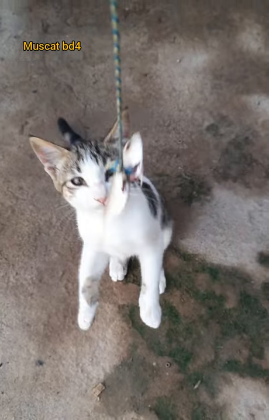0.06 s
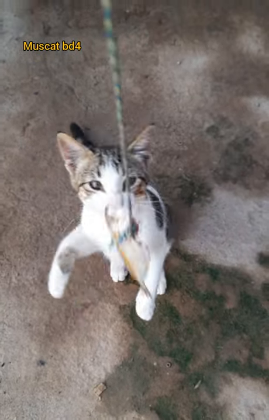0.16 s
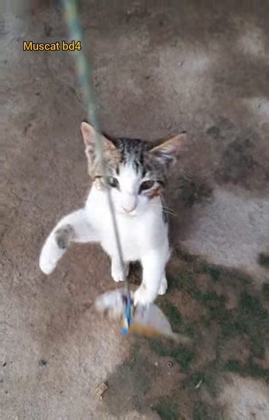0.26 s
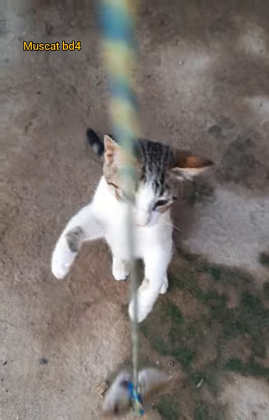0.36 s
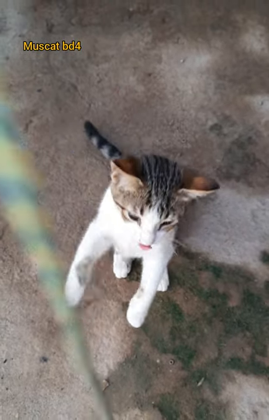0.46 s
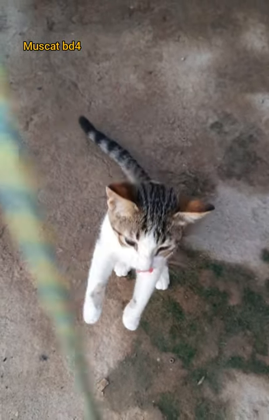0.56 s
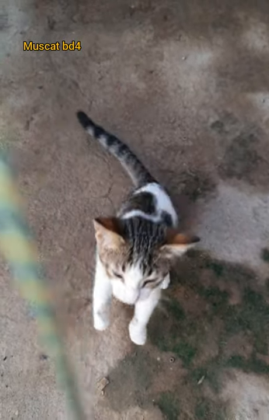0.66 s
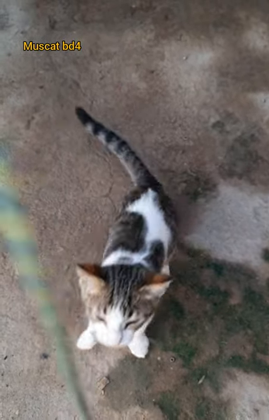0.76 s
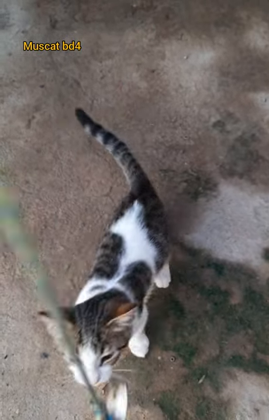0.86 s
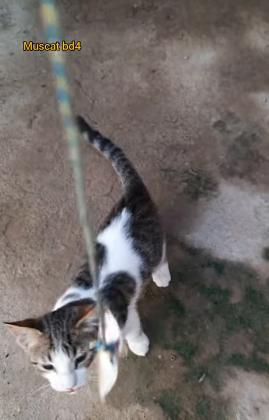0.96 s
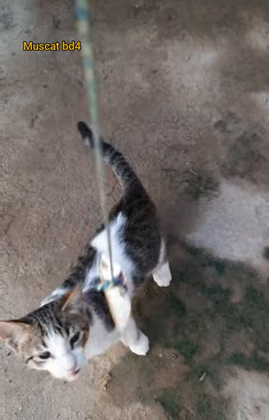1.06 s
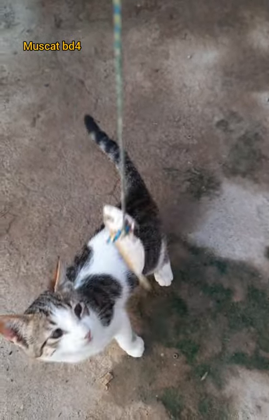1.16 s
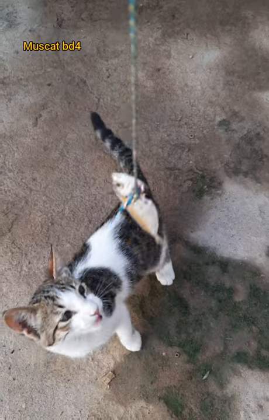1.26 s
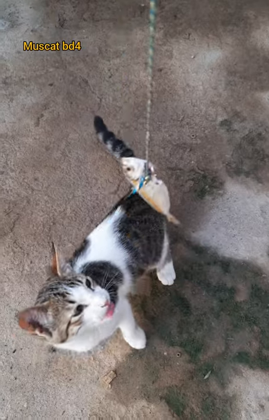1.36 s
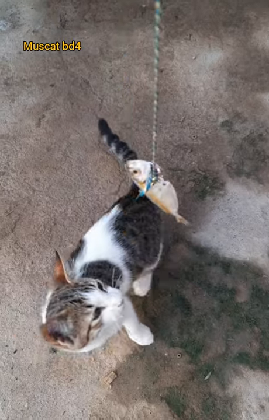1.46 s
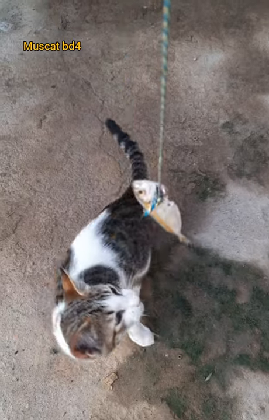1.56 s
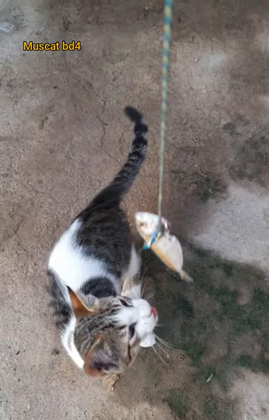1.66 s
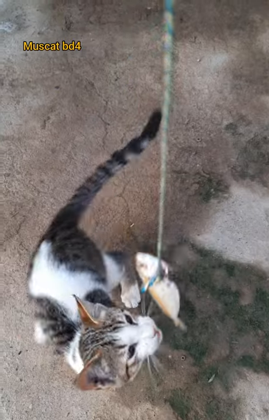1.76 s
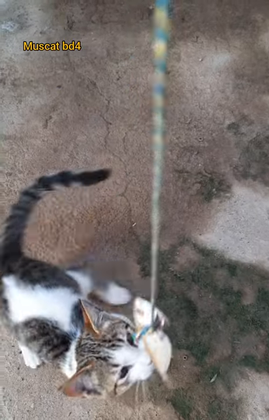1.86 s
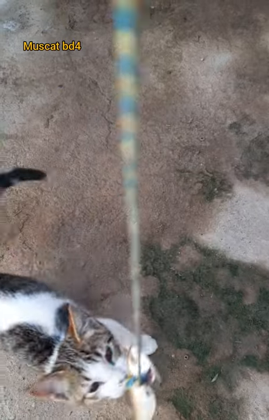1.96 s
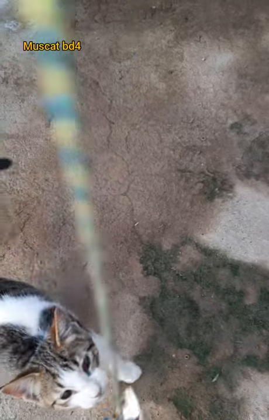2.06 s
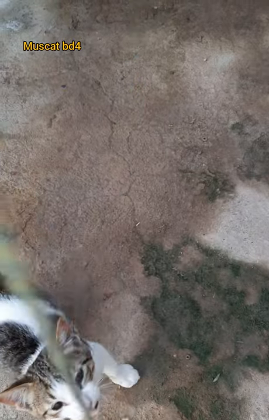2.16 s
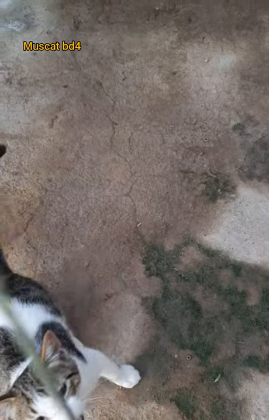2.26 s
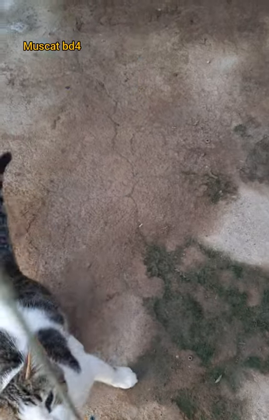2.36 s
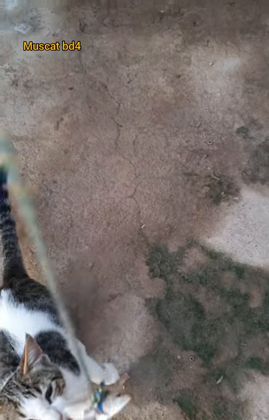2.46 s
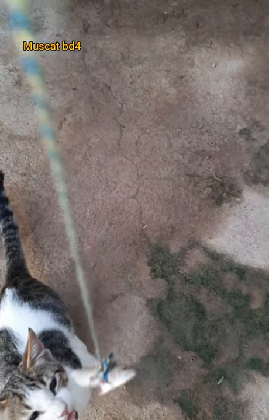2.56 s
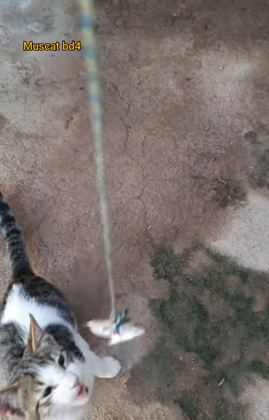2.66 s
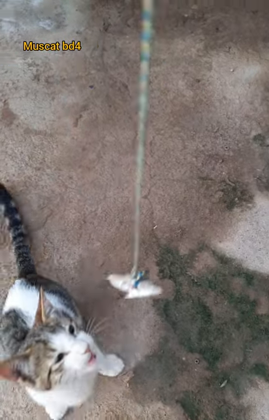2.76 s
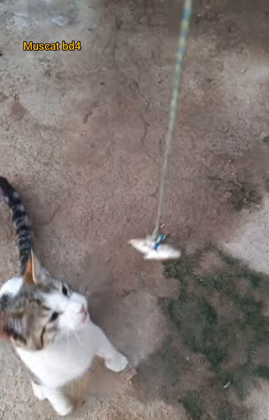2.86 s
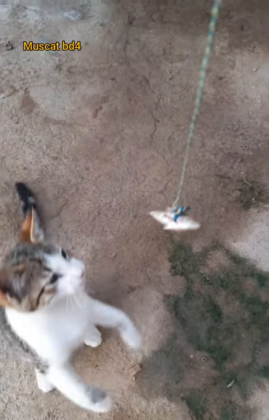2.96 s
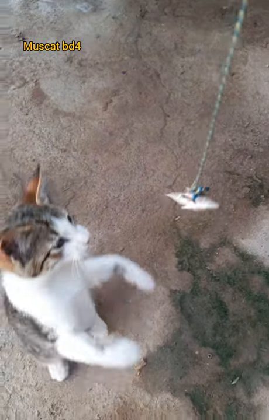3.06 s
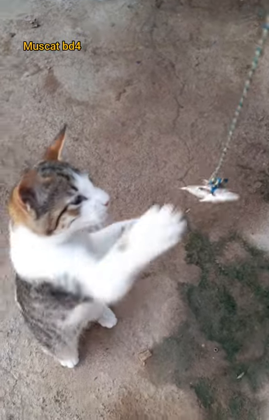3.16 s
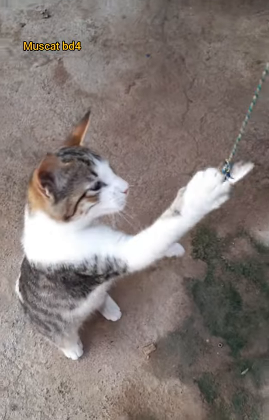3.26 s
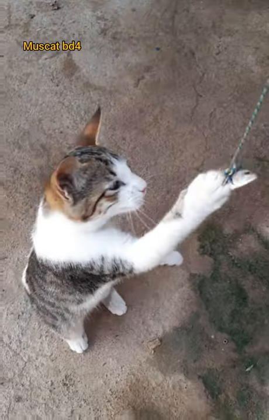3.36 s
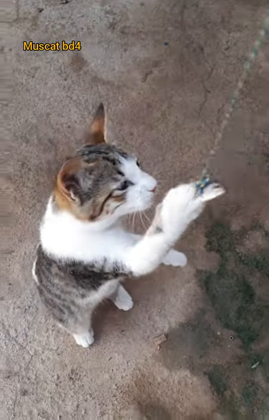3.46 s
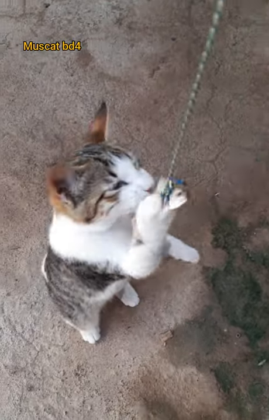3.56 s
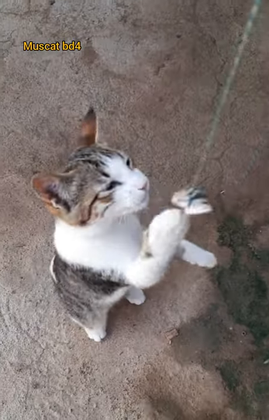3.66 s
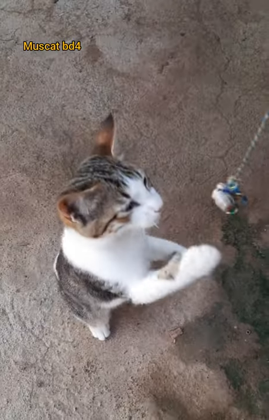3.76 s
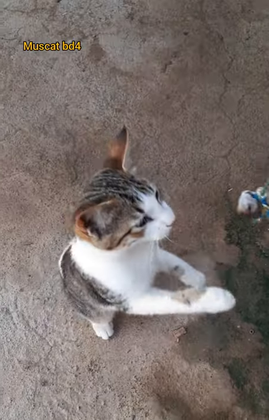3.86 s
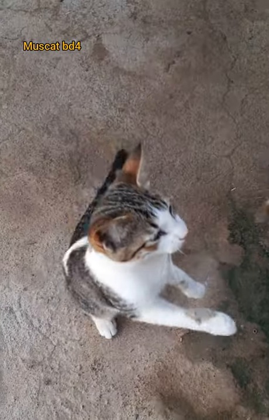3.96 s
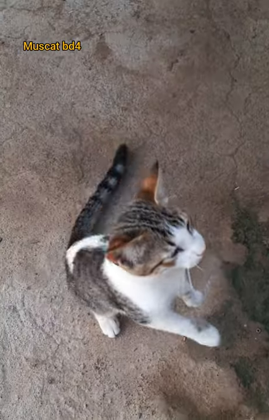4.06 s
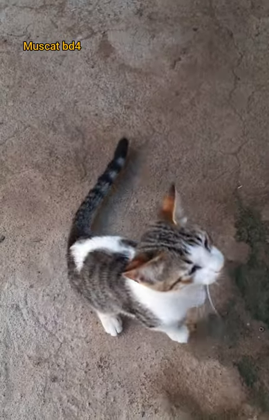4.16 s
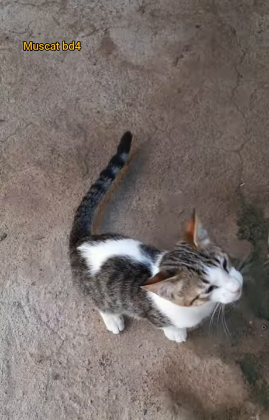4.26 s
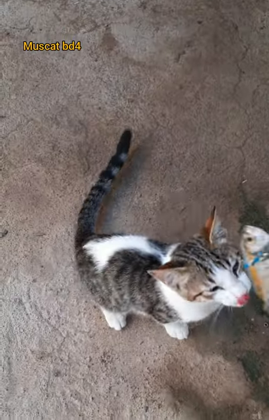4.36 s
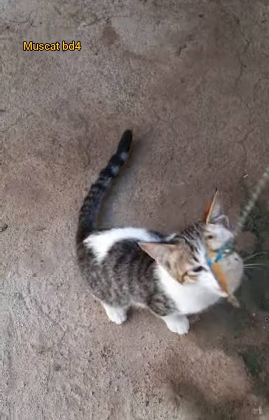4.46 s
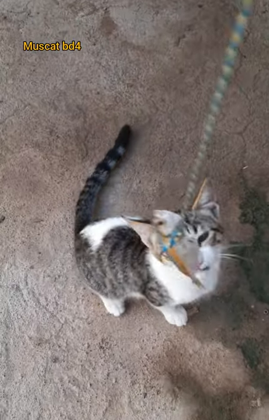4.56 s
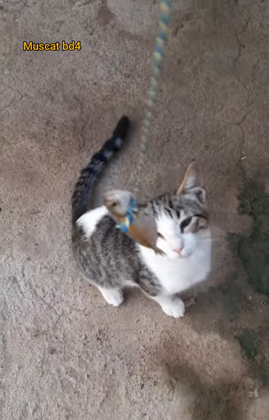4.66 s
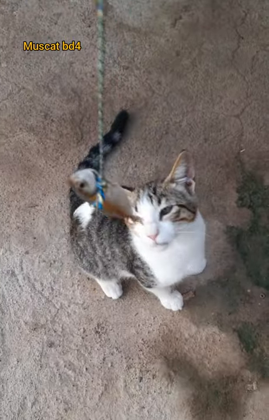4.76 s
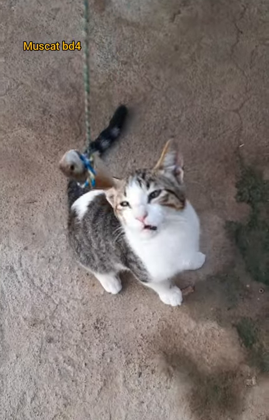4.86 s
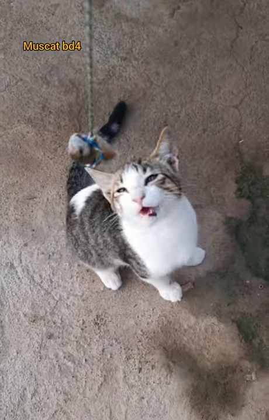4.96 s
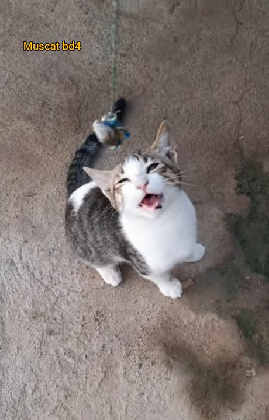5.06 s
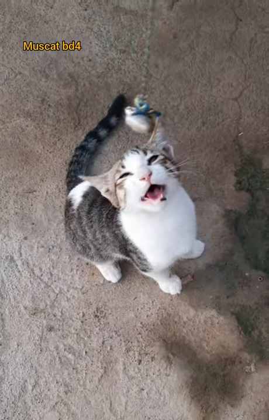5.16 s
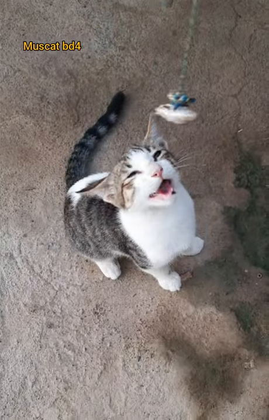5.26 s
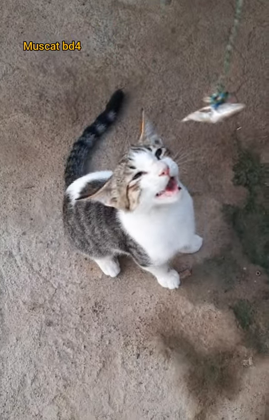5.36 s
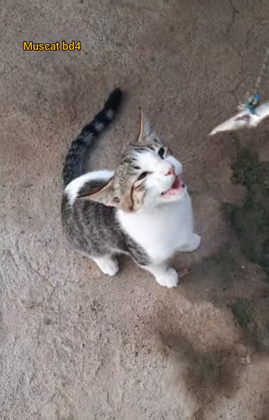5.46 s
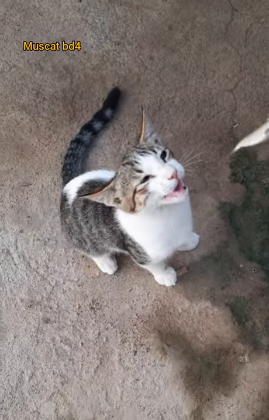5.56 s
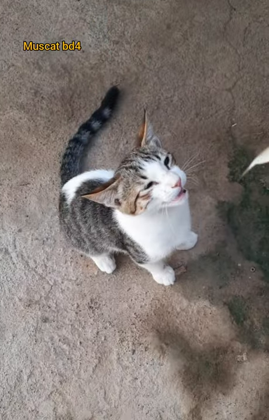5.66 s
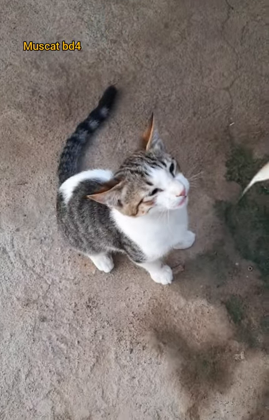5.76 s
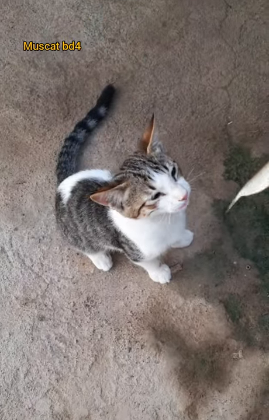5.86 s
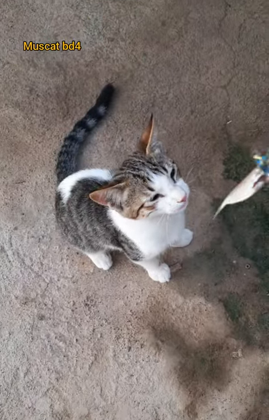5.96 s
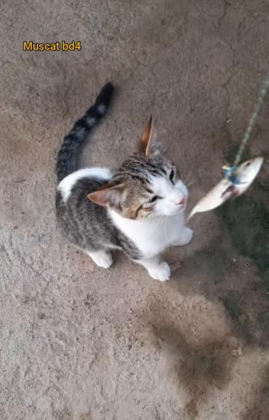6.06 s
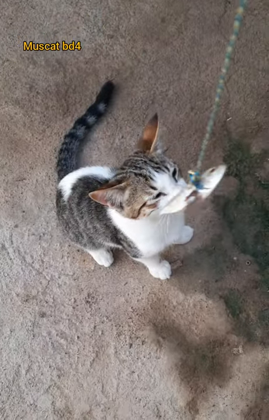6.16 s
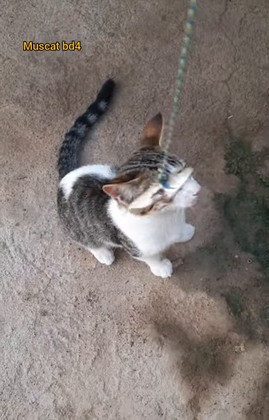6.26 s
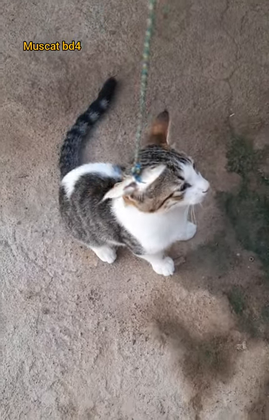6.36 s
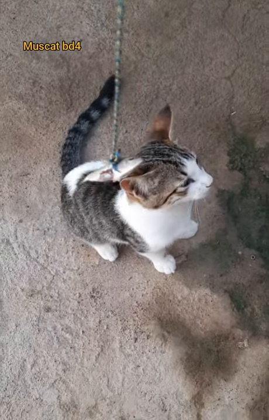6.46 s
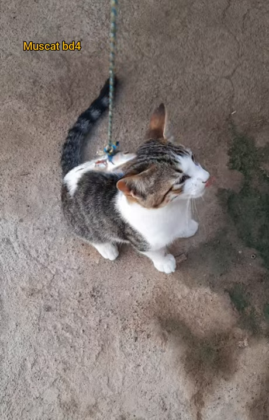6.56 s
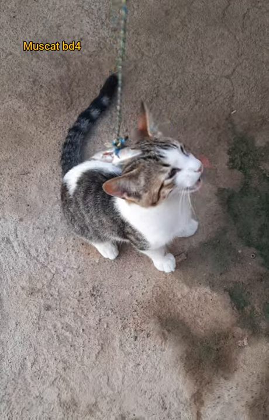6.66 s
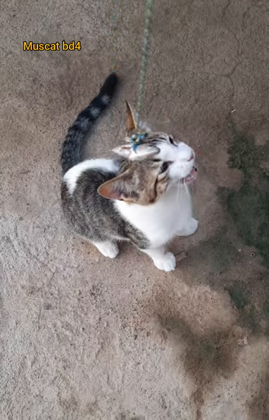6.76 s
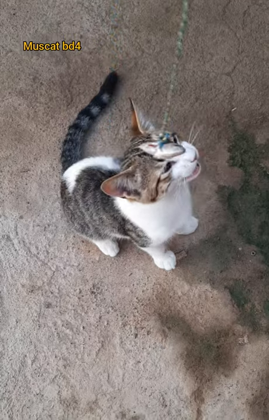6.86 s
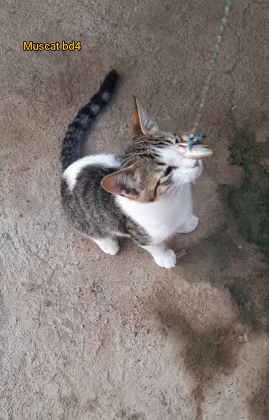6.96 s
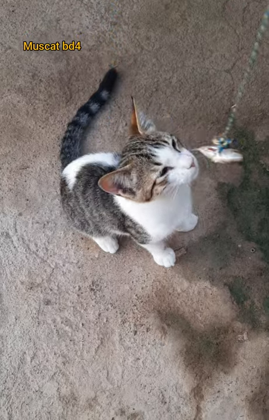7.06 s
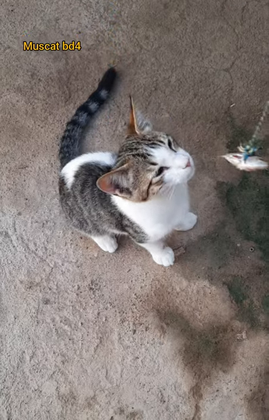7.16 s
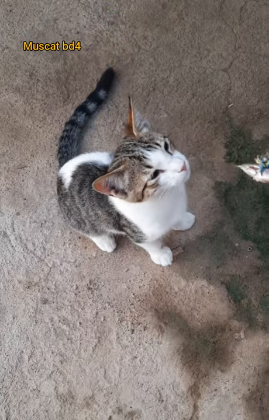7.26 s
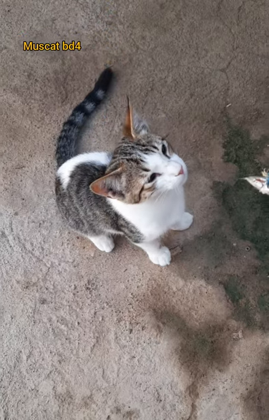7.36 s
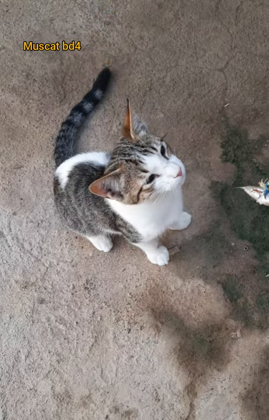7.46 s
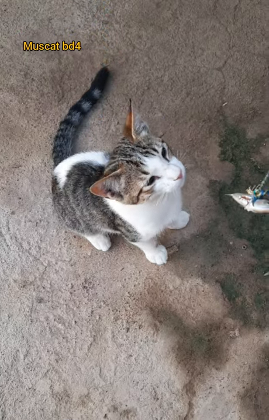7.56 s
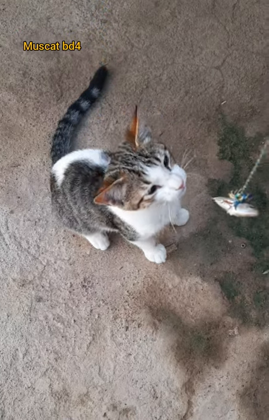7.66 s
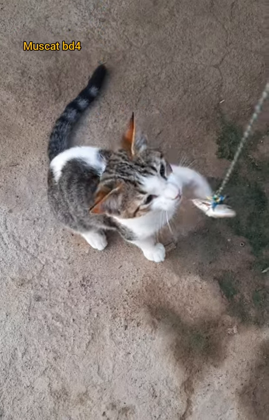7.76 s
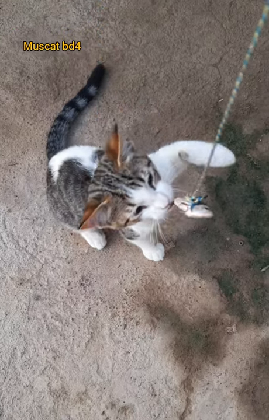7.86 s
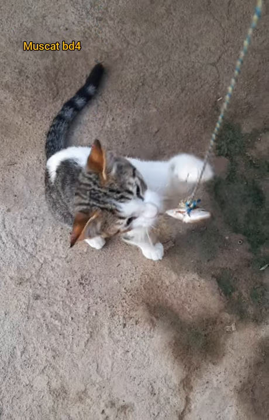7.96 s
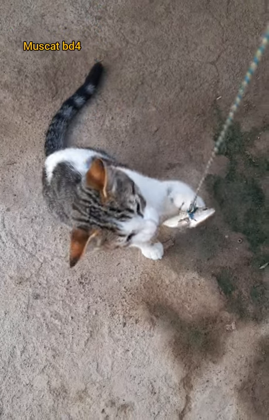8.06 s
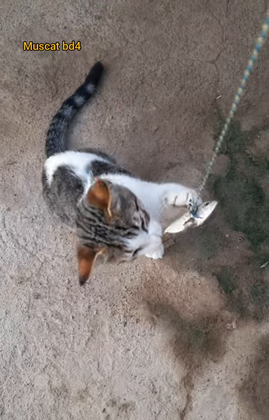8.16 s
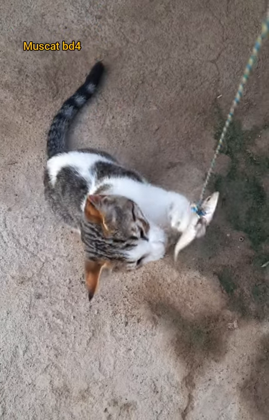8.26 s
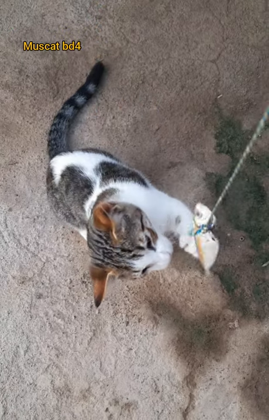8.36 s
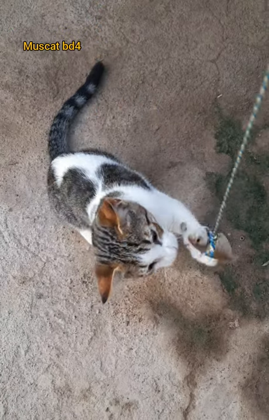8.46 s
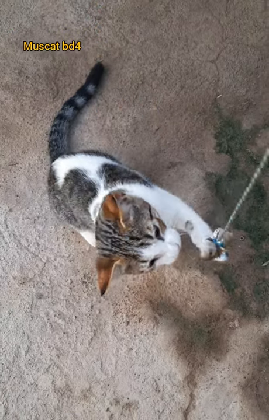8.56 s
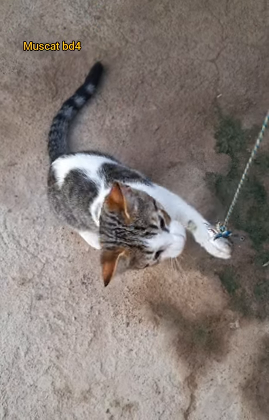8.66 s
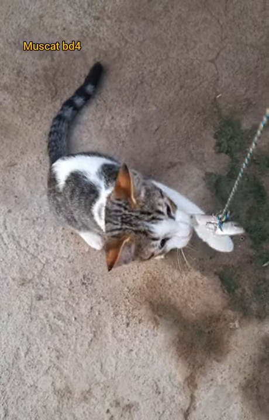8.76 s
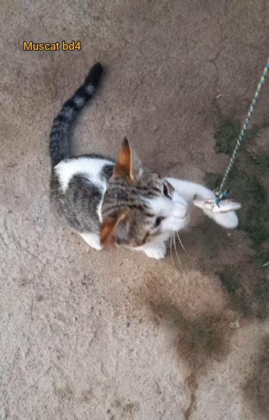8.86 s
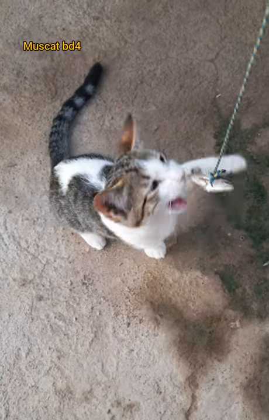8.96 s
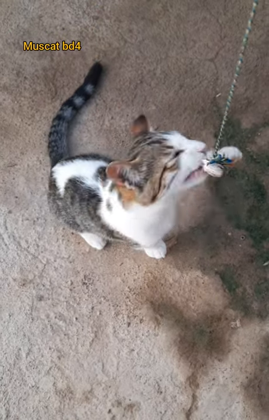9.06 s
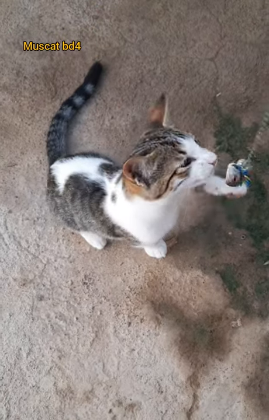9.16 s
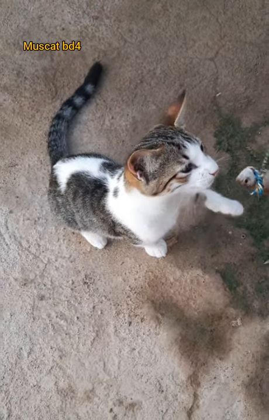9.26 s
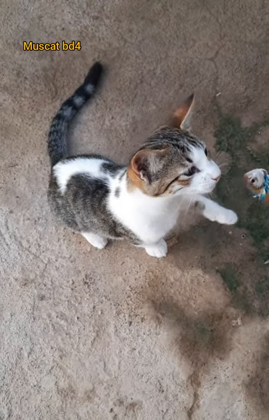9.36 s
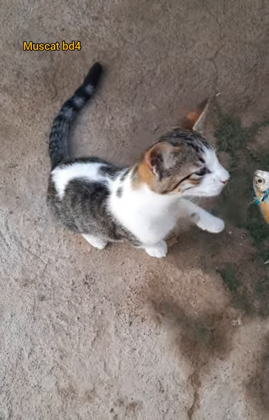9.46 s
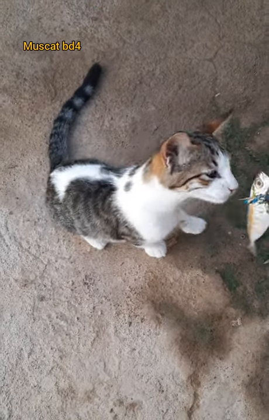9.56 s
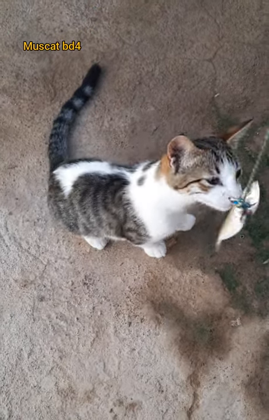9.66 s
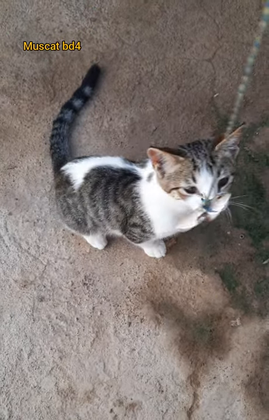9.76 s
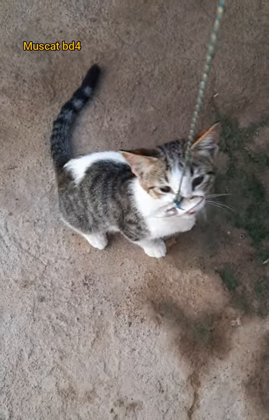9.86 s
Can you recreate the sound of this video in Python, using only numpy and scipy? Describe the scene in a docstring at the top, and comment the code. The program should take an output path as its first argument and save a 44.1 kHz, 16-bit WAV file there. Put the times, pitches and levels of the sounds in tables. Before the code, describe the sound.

Close to the microphone in an outdoor yard, a young cat gives five clear, slightly raspy meows, with a short echo from paving and walls. A dry tick and a few soft wind thumps come around the first two calls. Distant birds whistle and chirp mostly in the second half, while quiet town rumble and a very faint rustle of leaves lie underneath.

```python
"""Cat meowing in a paved yard

A young cat meows five times, a metre below a phone with two microphone ports. Its clear voice runs
through two moving mouth resonances, breaks into short rough catches and ends as the mouth shuts;
paving and walls echo it. Far birds whistle over town rumble, leaves rustle, two dry ticks sound
and wind buffets the right port."""
import sys
import numpy as np
from scipy import signal
from scipy.io import wavfile
from scipy.ndimage import uniform_filter1d

SR = 44100
rng = np.random.default_rng(int(sys.argv[2]) if len(sys.argv) > 2 else 0)


def wrap_up_sound(samples):
    """Save the sound to the file named by the first command line argument, as 16-bit audio."""
    columns = np.atleast_2d(samples).T
    # keep every value between -1 and 1, then stretch to whole-number steps
    tamed = np.clip(columns, -1, 1)
    steps = np.round(tamed * 32767).astype(np.int16)
    wavfile.write(sys.argv[1], SR, steps)


N = 436590

# Port imbalance. Each row: frequency in Hz, left minus right in dB.
PORT_BALANCE = [(200, 4.5), (600, 3), (1300, 5), (2400, -2), (4400, 6), (8100, 11), (11500, -8),
                (15000, -9)]


def undb(db):
    """Decibels to gain."""
    return np.exp(np.asarray(db) * np.log(10) / 20)


def unit(x):
    """Scale to rms 1."""
    return x / np.sqrt(np.mean(x ** 2))


def colour(table, hz):
    """Read a (Hz, value) table on a log-frequency axis."""
    knots_hz, values = np.transpose(table)
    return np.interp(np.log(hz), np.log(knots_hz), values)


def band(x, lo_hz, hi_hz):
    """Band-pass filter."""
    sos = signal.butter(2, [lo_hz, min(hi_hz, .45 * SR)], "band", fs=SR, output="sos")
    return signal.sosfilt(sos, x)


def walk(rate_hz, n):
    """Linearly interpolated noise, rms about 1."""
    knots = rng.standard_normal(int(n * rate_hz / SR) + 2)
    return np.sqrt(3 / 2) * np.interp(np.arange(n) * rate_hz / SR, np.arange(len(knots)), knots)


def sides(x, pan_db):
    """Pan over both ports; positive is left."""
    return np.array([x * undb(pan_db / 2), x * undb(-pan_db / 2)])


def add(out, start_s, x):
    """Mix x into both ports."""
    out[:, int(start_s * SR):][:, :x.shape[-1]] += x


def echoes(x, t60_s):
    """Paving and walls: a dense, dull, decaying tail for each port."""
    t = np.arange(int(.6 * SR)) / SR
    tails = band(rng.standard_normal((2, len(t))), 250, 9000) * undb(-60 * t / t60_s) * (t > .008)
    tails /= np.sqrt(np.sum(tails ** 2, axis=1, keepdims=True))
    return signal.oaconvolve(x, tails, axes=1)[:, :N]


def town(rms_db=-69):
    """Town noise in drifting half-octave bands, alike at both ports only in the bass."""
    # Each row: frequency in Hz, relative noise density in dB.
    spectrum = [(59, -29), (100, -6), (173, -12.5), (243, -1.5), (449, -13.5), (2100, -23.5), (5570, -34),
                (7980, -34.5), (15700, -33)]
    out = 0
    for hz in 110 * 2 ** np.arange(0, 7.3, .5):
        mid, side = band(rng.standard_normal((2, N)), hz / 1.19, hz * 1.19)
        side *= np.clip(hz / 900, .6, 1)
        gain = undb(colour(spectrum, hz) + 1.1 * walk(7.2, N))
        out += sides(gain, .65 * colour(PORT_BALANCE, hz)) * np.array([mid + side, mid - side])
    return undb(rms_db) * unit(out)


def breeze():
    """Low rumble of moving air."""
    # Each row: time in seconds, gain in dB.
    envelope = [(0, -71), (.5, -67.5), (.95, -58), (1.3, -67), (3.2, -66.5), (9.9, -70)]
    mid, side = band(rng.standard_normal((2, N)), 48, 95)
    rumble = sides(unit(mid), pan_db=2.5) + .5 * np.array([unit(side), -unit(side)])
    return rumble * undb(np.interp(np.arange(N) / SR, *np.transpose(envelope)))


def leaves():
    """Leaves rustle in spells of flickering hiss, to the left."""
    # Each row: centre in seconds, half length in seconds, level in dB.
    spells = [(3.451, 0.28, -81.5), (4.36, 0.47, -89.5), (6.285, 0.056, -82.5), (8.296, 0.29, -79.5),
              (9.172, 0.16, -83.5)]
    t = np.arange(N) / SR
    envelope = sum(undb(db) * np.exp(-((t - at_s) / half_s) ** 4) for at_s, half_s, db in spells)
    envelope *= undb(2.5 * walk(12, N))
    return sides(envelope, pan_db=9) * unit(band(rng.standard_normal((2, N)), 7100, 8600))


def buffets(swing_hz=66.8):
    """Wind slaps the right port: two or three slow pressure swings each."""
    # Each row: start in seconds, gain in dB.
    slaps = [(1.882, -67), (2.3, -52.5), (2.926, -50), (2.977, -53.5), (3.068, -53.5)]
    t = np.arange(SR // 5) / SR
    swing = np.sin(2 * np.pi * swing_hz * t) * (t / .0053) * np.exp(1 - t / .013)
    out = np.zeros((2, N))
    for start_s, db in slaps:
        add(out, start_s, undb(db) * swing * np.array([[.15], [1.9]]))
    return out


def ticks(decay_s=.00037):
    """Dry ticks, each a millisecond of treble."""
    # Each row: start in seconds, relative level in dB, left minus right in dB.
    events = [(0.5077, -39.5, 42), (2.209, -60, 2)]
    t = np.arange(SR // 5) / SR
    out = np.zeros((2, N))
    for start_s, db, pan_db in events:
        tick = band(rng.standard_normal(len(t)) * np.exp(-t / decay_s), 4660, 7000)
        tick *= undb(db) / np.max(np.abs(tick))
        add(out, start_s, sides(tick, pan_db) / np.mean(sides(.3, pan_db)))
    return out


def bird_notes(clear=.08, raspy=.3):
    """Bird notes as (start s, length s, first Hz, held Hz, gain dB, flutter rate / pitch)."""
    # Falling chirps. Each row: start in seconds, gain in dB.
    chirps = [(8.35, -81), (8.619, -79), (8.879, -80), (9.184, -80)]
    # Level whistles. Each row: start in seconds, length in seconds, pitch in Hz, gain in dB.
    peeps = [(8.14, 0.074, 3530, -83), (9.524, 0.058, 5600, -66.5), (9.55, 0.14, 2424, -77.5),
             (9.83, 0.12, 5660, -74.5)]
    # High-low calls. Each row: low note's start in seconds, high note's Hz and dB, low note's Hz and dB.
    calls = [(3.203, 4120, -89, 2200, -69.5), (5.929, 3530, -71, 1862, -68), (6.361, 3880, -82, 2045, -72),
             (6.733, 2960, -87, 2157, -75), (7.125, 3090, -78.5, 2194, -73), (7.56, 2944, -86, 2150, -73.5)]
    note_s, step_hz_per_s, slur_ratio = .14, 12000, 1.6
    notes = [(start_s, .098, 3460, 2250, db, raspy) for start_s, db in chirps]
    notes += [(start_s, length_s, hz, hz, db, clear) for start_s, length_s, hz, db in peeps]
    for low_s, high_hz, high_db, low_hz, low_db in calls:
        high_s = low_s - (high_hz - low_hz) / step_hz_per_s
        first_hz = high_hz if high_hz > slur_ratio * low_hz else low_hz
        notes.append((high_s, note_s, high_hz, high_hz, high_db, clear))
        notes.append((low_s, note_s, first_hz, low_hz, low_db, clear))
    return notes


def birds(slur_s=.019, attack_s=.013):
    """Whistles, level or dropping to a held pitch; from afar they flutter and arrive mostly as echo."""
    out = np.zeros((2, N + SR))
    for start_s, length_s, first_hz, held_hz, db, flutter_ratio in bird_notes():
        t = np.arange(int(1.5 * length_s * SR)) / SR
        hz = held_hz + (first_hz - held_hz) * np.exp(-t / slur_s)
        swell = np.minimum(t / attack_s, 1) * held_hz / hz * np.exp(-(t / length_s) ** 4)
        flutter_hz = held_hz * flutter_ratio
        flutter = .5 + walk(flutter_hz, len(t)) + 1j * walk(flutter_hz, len(t))
        tone = np.exp(2j * np.pi * np.cumsum(hz) / SR)
        add(out, start_s, undb(db) * swell * np.real(flutter * tone))
    return .6 * out[:, :N] + echoes(out, t60_s=.2)


def gesture(rows, attack_s=.009, shut_s=.013, hum_s=.028, hum_hz=405.6):
    """Add a meow's opening swell and its end: the mouth shuts and the pitch drops to a dying hum."""
    start_s, start_hz, start_db, *opening = rows[0]
    end_s, _, end_db, over_db, *resonances_hz = rows[-1]
    onset = (start_s - attack_s, start_hz + 15, start_db - 8.5, *opening)
    shut = (end_s + shut_s, hum_hz, end_db, over_db - 3.5, *resonances_hz)
    faded = (end_s + shut_s + hum_s, hum_hz, end_db - 12, over_db - 7, *resonances_hz)
    return [onset, *rows, shut, faded]


def roughness(t, shut_at_s):
    """The vocal folds lose their beat in mid call and as the mouth shuts."""
    # Each row: centre in seconds, half length in seconds, roughness from 0 to 1.
    catches = [(0.778, 0.014, 0.67), (2.826, 0.014, 0.18)]
    return sum(depth * np.exp(-((t - at_s) / half_s) ** 2)
               for at_s, half_s, depth in [*catches, (shut_at_s, .017, .92)])


def overtone_gains(hz, over_db, top_db, presence_db, presence_hz=3774):
    """Throat colour, dulled by a closed mouth, with each meow's brightness near 3.8 kHz."""
    # Throat and microphone colour. Each row: frequency in Hz, gain in dB.
    tract = [(900, -20), (3500, -22), (4500, -33), (5900, -23.5), (8200, -22.5), (9200, -53.5),
             (10500, -69), (12500, -40.5), (15500, -48.5)]
    muffle_db = -2 * np.clip(hz / 1000 - 1, 0, 3) * np.clip(over_db / -17.5, 0, 1)
    bright_db = presence_db * np.exp(-(7 * (hz / presence_hz - 1)) ** 2)
    return undb(colour(tract, hz) + top_db * (hz > 11000) + muffle_db + bright_db)


def mouth(hz, lower_hz, upper_hz):
    """Gain of the two mouth resonances."""
    return 1 / (1 + ((hz - lower_hz) / 330) ** 2) + undb(-3) / (1 + ((hz - upper_hz) / 200) ** 2)


def nasal_ring_db(age_s, lower_hz, over_db, rough, shut_hz=1180, open_hz=1340):
    """The nasal ring comes in late, opens with the mouth and rises in catches."""
    closed = np.clip((open_hz - lower_hz) / (open_hz - shut_hz), 0, 1)
    late_db = -10 * np.exp(-age_s / .05)
    return -11.5 - 15.5 * closed + .27 * over_db + late_db + 3.2 * rough


def harmonics_at_ports(gains, harmonic_hz, phase, rough, lead_ms, breath_per_harmonic=.027):
    """Sum the raspy harmonics; ground echoes make each waver differently at each port."""
    n = len(phase)
    out = np.zeros((2, n))
    for k, (gain, hz) in enumerate(zip(gains, harmonic_hz), start=1):
        waver = .1 if k == 1 else 1
        rasp = 1 + (waver * rough + breath_per_harmonic * k) * walk(500, n)
        drift_db = .96 * waver * walk(24, n)
        pan_db = colour(PORT_BALANCE, hz.mean()) + 1.2 * waver * walk(10, n)
        lead_rad = np.pi * hz * lead_ms / 1000 + .1 * waver * walk(7, n)
        angle = k * phase + .21 * (k - 1) ** 2
        out += sides(gain * rasp * undb(drift_db), pan_db) * np.sin([angle + lead_rad, angle - lead_rad])
    return out


def meow(rows, lead_ms, seat_ring_db, top_db, presence_db, ring_hz=4200, flap_hz=190):
    """Vocal-fold harmonics shaped by mouth and nose. Returns start in seconds and sound."""
    times_s, *columns = np.transpose(rows)
    t = np.arange(int(times_s[0] * SR), int(times_s[-1] * SR)) / SR
    n = len(t)
    pitch_hz, base_db, over_db, lower_hz, upper_hz = (
        uniform_filter1d(np.interp(t, times_s, column), size=300) for column in columns)
    rough = roughness(t, shut_at_s=times_s[-2])
    jitter = .0043 * walk(40, n) + .061 * rough * walk(300, n)
    phase = 2 * np.pi * np.cumsum(pitch_hz * (1 + jitter)) / SR
    k = np.arange(1, 29)[:, None]
    hz = k * pitch_hz
    overtones = overtone_gains(hz, over_db, top_db, presence_db)
    oral = overtones * mouth(hz, lower_hz, upper_hz) * ((k > 1) & (hz < ring_hz))
    oral *= undb(over_db) / np.linalg.norm(oral, axis=0)
    ring_db = seat_ring_db + nasal_ring_db(t - times_s[0], lower_hz, over_db, rough)
    ring = overtones * (hz >= ring_hz)
    ring *= undb(ring_db) / np.linalg.norm(ring, axis=0)
    gains = undb(base_db) * ((k == 1) + oral + ring)
    # A slower throat oscillation puts faint sidebands on the first two harmonics.
    flap_phase = 2 * np.pi * np.cumsum(flap_hz * (1 + .021 * walk(6.3, n))) / SR
    gains[:2] *= 1 + 2 * undb(-31) * np.cos(flap_phase)
    voice = harmonics_at_ports(gains, hz, phase, rough, lead_ms)
    throat_air = undb(base_db - 34) * unit(band(rng.standard_normal(n), 100, 300))
    return times_s[0], np.sqrt(2) * (voice + throat_air) * signal.windows.tukey(n, 300 / n)


def cat():
    """Five meows and their echo in the yard."""
    # One list per meow, until the mouth shuts. Each row: time in seconds, pitch in Hz, fundamental
    # in dB, oral overtones over the fundamental in dB, lower and upper mouth resonance in Hz.
    meows = [
        [(.451, 495, -49, -19, 1100, 2500), (.645, 609, -40, -21.5, 1000, 2500),
         (.665, 586, -48, 13, 1180, 2500), (.71, 574, -43.5, 13, 1180, 2400), (.76, 565, -51, 11.5, 1200, 2250),
         (.774, 567, -39, -16.5, 1200, 2300), (.786, 581, -38, 12, 1175, 2250),
         (.825, 540.3, -41, 1, 1000, 2700), (.855, 565, -39, -5, 1025, 2550),
         (.92, 563.2, -35.5, -7, 1150, 2600), (.99, 539.8, -38.5, 3, 1450, 3250),
         (1.075, 552.7, -39.5, 0.5, 1300, 3200), (1.12, 542, -42, 15, 1550, 2720),
         (1.175, 535.2, -38, 5, 1350, 2750), (1.235, 518.3, -32, -8, 1080, 2900),
         (1.3, 512, -36, 7.5, 1450, 3350), (1.35, 532.6, -34, -10, 1300, 3375),
         (1.395, 493.6, -34.5, 2.5, 1300, 2800), (1.44, 507, -36, -8.5, 1050, 2800),
         (1.5, 486.5, -39, -1, 1200, 2300), (1.52, 464, -35, -3.5, 1000, 2100)],
        [(2.185, 499, -46, -14, 950, 2300), (2.225, 532, -42.5, -4.5, 1375, 2250),
         (2.29, 564.8, -42, 9.5, 1450, 2230), (2.4, 554.2, -40.5, 10, 2030, 3030),
         (2.55, 552.2, -38, 9, 1960, 2940), (2.68, 557.8, -38.5, 10.5, 1262, 2200),
         (2.76, 560.3, -40.5, 9, 1450, 2700), (2.82, 519.6, -37, 10.5, 1440, 2350),
         (2.87, 525.4, -40.5, -5, 1450, 2200), (2.9, 508, -41, 0.5, 1250, 2300)],
        [(4.978, 544, -55, 12.5, 1650, 2300), (5.005, 587.3, -51.5, 14.5, 1700, 2500),
         (5.06, 552.6, -47, 15, 1650, 2450), (5.17, 549.4, -39.5, 10.5, 1390, 2220),
         (5.43, 546.6, -43, 13.5, 1520, 2850), (5.53, 544.2, -40, 8.5, 1400, 2500),
         (5.65, 528.7, -36.5, 5.5, 1170, 2120), (5.74, 497.8, -39.5, 4, 1046, 2020),
         (5.797, 469, -42, -1.5, 1050, 2000)],
        [(7.604, 456, -54.5, -18, 950, 2300), (7.635, 462, -52, -17, 950, 2325),
         (7.7, 537, -44, -9.5, 1250, 2500), (7.78, 542.5, -46, 7, 2140, 3080),
         (7.88, 576.4, -44, 8.5, 1500, 2450), (7.96, 552, -44.5, 7, 1450, 2250),
         (8.04, 510.6, -36.5, -13.5, 1150, 2300), (8.108, 458, -46, -13.5, 950, 2025)],
        [(9.862, 493, -57.5, -13.5, 1100, 2500), (9.9, 515, -53.5, -8, 1190, 2500)],
    ]
    # Position and colour of each meow. Each row: left port's lead in ms, nasal ring offset in dB,
    # weight above 11 kHz in dB, brightness near 3.8 kHz in dB.
    seats = [(-.12, -5.5, -1.5, -10), (-0.098, 1.5, 2, 12), (0.13, 0, -9.5, 7.5), (0.16, 0, -13, 13.5),
             (0.089, 3, -9, -2)]
    out = np.zeros((2, N + SR))
    for rows, seat in zip(meows, seats):
        add(out, *meow(gesture(rows), *seat))
    return out[:, :N] + undb(-9.5) * echoes(out, t60_s=.28)


def scene():
    """All sources at the two ports."""
    return cat() + birds() + ticks() + buffets() + town() + breeze() + leaves()


def record(dry, cutoff_hz=15750):
    """The phone cuts the top."""
    return signal.sosfilt(signal.ellip(10, .2, 70, cutoff_hz, fs=SR, output="sos"), dry)


dry = scene()
out = record(dry)
wrap_up_sound(out)
```